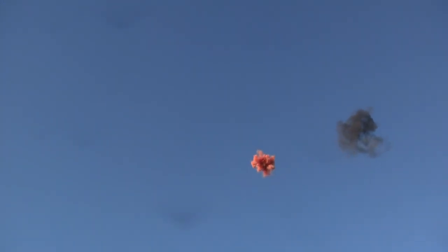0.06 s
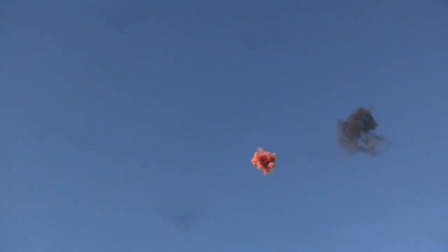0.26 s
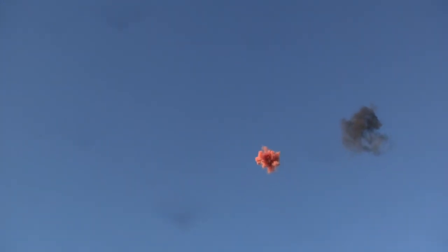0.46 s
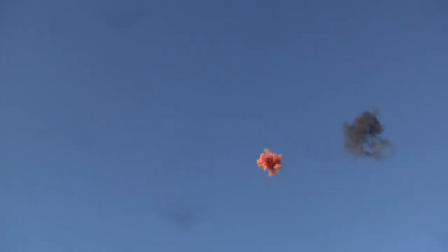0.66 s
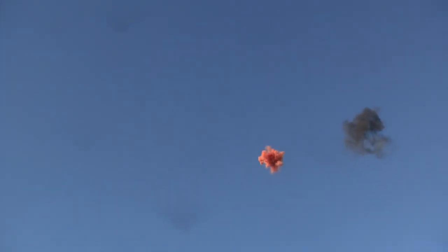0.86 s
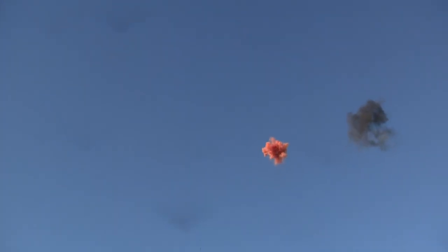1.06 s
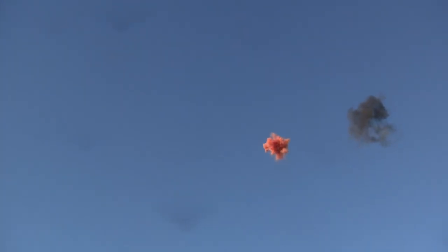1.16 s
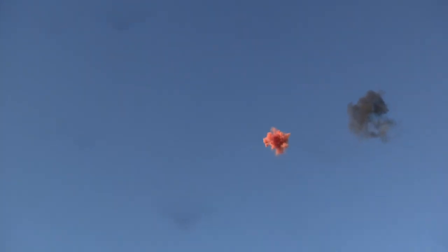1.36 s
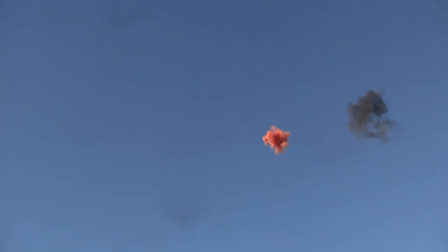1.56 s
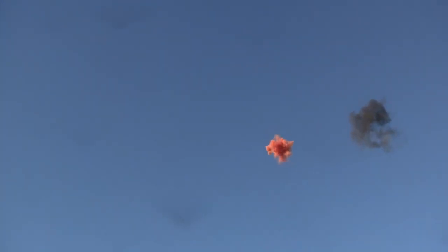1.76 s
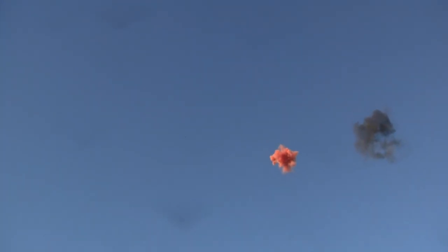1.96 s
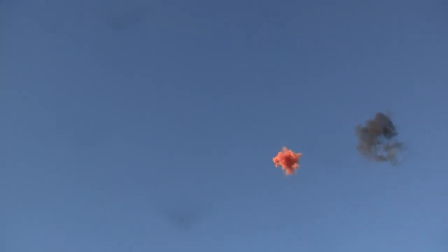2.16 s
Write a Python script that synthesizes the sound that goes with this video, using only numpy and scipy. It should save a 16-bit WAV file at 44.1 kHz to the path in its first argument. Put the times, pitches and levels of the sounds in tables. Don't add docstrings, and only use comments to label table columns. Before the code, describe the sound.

A firework shell bangs very loudly overhead, then rumbling echoes and fainter cracks trail away

```python
import sys
import numpy as np
from scipy import signal
from scipy.fft import rfft, irfft
from scipy.io import wavfile
from scipy.ndimage import uniform_filter1d

SR = 44100
rng = np.random.default_rng(int(sys.argv[2]) if len(sys.argv) > 2 else 0)


def master(y):
    cut = np.clip(np.atleast_2d(y).T, -1, 1)
    pcm = np.round(cut * 32767)
    wavfile.write(sys.argv[1], SR, pcm.astype(np.int16))


def voltage_ratio(level):
    return 10 ** (np.asarray(level, float) / 20)


N = 97020
T = np.arange(N) / SR
HZ = np.maximum(np.arange(N // 2 + 1) * SR / N, 1)
FAR_LAG_S = 3e-5
HALVES = np.array([[.5], [-.5]])


def curve(table):
    hz, value = np.array(table).T
    return np.interp(np.log(HZ), np.log(hz), value)


def colour(x, db):
    gain = voltage_ratio(db)
    return rfft(x) * gain / np.sqrt(np.mean(gain ** 2))


def shocks(scatter_db):
    x = rng.standard_normal(N) * voltage_ratio(scatter_db * rng.exponential(size=N))
    return x / x.std()


def walk(rate_hz):
    hold = int(SR / rate_hz)
    steps = np.repeat(rng.standard_normal(N // hold + 1), hold)
    x = uniform_filter1d(steps, hold)[:N]
    return x / x.std()


def delayed(x, lag_s):
    return irfft(rfft(x) * np.exp(-2j * np.pi * HZ * lag_s), N)


def ports(x, stray, left_db, lag_s):
    left = x * voltage_ratio(left_db / 2)
    right = (delayed(x, lag_s) + stray) * voltage_ratio(-left_db / 2)
    return np.array([left, right])


def bursts(arrivals, colour_table, scatter_db, left_db, stray_db, lag_s):
    peak_roundness = 1.3
    body_gain = curve(colour_table)
    x, stray = 0, 0
    for at, db, rise_ms, fall_ms, tilt in arrivals:
        from_peak = 1e3 * np.where(T < at, (at - T) / rise_ms, (T - at) / fall_ms)
        shape = voltage_ratio(db) * np.exp(-from_peak ** peak_roundness)
        gain = body_gain + tilt * np.log2(HZ / 1000)
        x = x + colour(shocks(scatter_db) * shape, gain)
        stray = stray + colour(rng.standard_normal(N) * shape, gain)
    stray_gain = voltage_ratio(stray_db + 3 * np.log2(1 + HZ / 1000))
    return ports(irfft(x, N), irfft(stray * stray_gain, N), left_db, lag_s)


def rumble():
    # t/s, level/dB, brightness above the knee/(dB per octave)
    course = [(0, -44.5, 2), (.1, -44.5, 3.5), (.22, -40.5, 1.5), (.4, -42.5, 8), (.55, -39.5, 2),
              (.65, -40, 2), (.8, -45, 2), (.9, -41.5, 2.5), (1.0, -45.5, 2.5), (1.2, -44.5, 2),
              (1.3, -46.5, 6.5), (1.41, -43, 2.5), (1.55, -45.5, 2.5), (1.63, -47, 2), (1.8, -45.5, 1),
              (1.92, -43, 0.5), (2.1, -47, 0.5), (2.2, -47, -1)]
    # f/Hz, gain/dB
    tone = [(30, -1), (70, -3.5), (165, -3), (400, -4), (800, -11), (2000, -25.5), (3600, -39.5),
            (10000, -83)]
    # f/Hz, left minus right/dB
    lean = [(60, -3), (110, 5), (200, 2), (380, 7.5), (700, 5.5), (1290, 5.5), (2380, 3.5), (4400, 2.5),
            (8120, -7), (15000, -2)]
    knee_hz, lumps_from_hz = 800, 120
    lump_db, lumps_per_s = 1.6, 160
    swell_db, swells_per_s = .6, 12
    likeness = 0.66

    at, db, bright = np.array(course).T
    same, left_only, right_only = (shocks(1.2) for _ in range(3))
    common = np.array([same, delayed(same, FAR_LAG_S)])
    separate = np.array([left_only, right_only])
    pair = rfft(np.sqrt(likeness) * common + np.sqrt(1 - likeness) * separate)
    gain = voltage_ratio(curve(tone) + HALVES * curve(lean))
    pair = pair * gain / np.sqrt(np.mean(gain ** 2))

    out, lumps = 0, walk(lumps_per_s)
    for centre in 25 * 2. ** np.arange(9):
        window = np.cos(np.pi / 2 * np.clip(np.log2(HZ / centre), -1, 1)) ** 2
        band = irfft(pair * window, N)
        lift = np.interp(T, at, bright) * max(np.log2(centre / knee_hz), 0)
        lumpy = lump_db * lumps * (lumps_from_hz < centre < knee_hz)
        out = out + band * voltage_ratio(lift + lumpy + swell_db * walk(swells_per_s))
    return out * voltage_ratio(np.interp(T, at, db))


def far_cracks():
    # t of peak/s, level/dB, rise/ms, fall/ms, tilt/(dB per octave)
    cracks = [(.012, -38, 11, 17, -11.5), (.005, -57, 14, 32, 3), (.153, -53, 0.77, 3.5, -2.5),
              (.42, -45.5, 52, 73, 5.5), (.605, -52.5, 15, 14, 2), (.657, -51.5, 13, 21, 5),
              (.74, -57, 84, 100, 0.5), (.95, -62, 54, 71, 2), (1.38, -64.5, 37, 78, 2),
              (.87, -60, 11, 45, 3), (1.16, -58.5, 4, 16, 1.5), (1.202, -60.5, 12, 15, 5),
              (1.2605, -34, 7.6, 5.2, -1), (1.283, -44, 9.7, 7.9, -1.5), (1.314, -44.5, 10.2, 12, -1.5),
              (1.425, -47, 24, 5.6, -4.5), (1.465, -50, 3.5, 7, -2), (1.488, -51, 8.6, 3.8, -3.5),
              (1.685, -64, 0.8, 3, -1), (2.2, -49.5, 9, 8, -6)]
    # f/Hz, gain/dB
    tone = [(200, -33), (500, -10), (900, 3), (1500, -2), (3000, -8.5), (5000, -16.5), (9000, -32.5),
            (14000, -60)]
    return bursts(cracks, tone, scatter_db=2., left_db=8, stray_db=-12, lag_s=FAR_LAG_S)


def thumps():
    # t/s, peak/dB, pitch f/Hz, fade/cycles, left minus right/dB
    swings = [(0.2354, -22.5, 336, 0.59, -1), (0.2418, -16.5, 101, 2.23, -1.5), (0.2489, -2, 1302, 3.5, 1),
              (0.2521, -4, 181, 0.85, .5), (.2537, -7.5, 575, 3.6, 2), (0.2544, -4, 1478, 4, -2),
              (0.2573, -14.5, 78, 1.3, 1), (0.458, -31, 90, 0.87, -9), (0.531, -27, 69.5, 1.4, 3.5),
              (0.578, -27, 264, 0.6, 9), (1.221, -28, 270, 0.78, 11), (1.2598, -29, 1150, 1.1, 12),
              (1.3147, -24.5, 1270, 1.4, 6), (0.1526, -37.5, 920, 0.76, -4), (1.685, -35.5, 610, 1.9, 9),
              (1.186, -38, 307, 1.1, 6), (1.333, -22, 210, 0.33, 8), (1.3425, -28, 260, 0.33, 14),
              (1.398, -26.5, 324, 0.39, 13), (1.404, -37.5, 158, 1.3, 18), (1.541, -40.5, 73, 2.3, 4),
              (1.854, -35, 350, 1.3, 10), (1.901, -38.5, 176, 2.2, 1)]
    out = 0
    for at, db, hz, fade_cycles, left_db in swings:
        cycles = np.maximum(T - at, 0) * hz
        onset = 1 - np.exp(-cycles / 0.14)
        swing = np.sin(2 * np.pi * cycles) * np.exp(-cycles / fade_cycles) * onset
        out = out + voltage_ratio(db + HALVES * left_db) * swing
    return out


def overhead_blast():
    # t of peak/s, level/dB, rise/ms, fall/ms, tilt/(dB per octave)
    arrivals = [(.24, -16, 2, 12, -3.5), (.249, -11.5, 5.6, 7.2, -1), (.2545, -7, 4.9, 6.2, -3),
                (.283, -14, 11.8, 13, -1.5), (.2925, -19, 2, 5.7, -2), (.265, -23, 12, 8, -0.5),
                (.31, -22, 8.8, 10, -1), (.33, -22.5, 10, 26, -3), (.352, -26, 30, 17, 1),
                (.4, -40.5, 4, 4, 2), (.378, -35, 24, 14, 4.5), (.447, -40, 8.9, 22, 4),
                (.468, -34, 14, 34, 0.5), (.51, -47, 18, 116, 0), (1.045, -42.5, 12, 36, -2.5),
                (1.095, -44.5, 23, 90, -2.5)]
    # f/Hz, gain/dB
    tone = [(100, -1.5), (300, -11.5), (600, -0.5), (1000, -3), (1450, -5), (2700, -8.5), (8500, -21.5),
            (16000, -43)]
    arrives_s, front_s = .2352, .003
    blast = bursts(arrivals, tone, scatter_db=1.6, left_db=0.45, stray_db=-20, lag_s=4e-5)
    return blast * np.clip((T - arrives_s) / front_s, 0, 1)


def ticks():
    # t/s, level/dB
    touches = [
        (1.752, -62.5),
        (1.84, -65),
    ]
    shape = sum(voltage_ratio(db) * np.exp(-np.abs(T - at) / 0.0014) for at, db in touches)
    band = signal.butter(2, [6000, 12000], "band", fs=SR, output="sos")
    return signal.sosfilt(band, shape * rng.standard_normal(N))


def scene():
    return rumble() + far_cracks() + thumps() + overhead_blast() + ticks()


def band_limit(x):
    return signal.sosfilt(signal.butter(12, 16410, fs=SR, output="sos"), x)


def record(dry):
    hiss_band = signal.butter(1, [2100, 10000], "band", fs=SR, output="sos")
    hiss = voltage_ratio(-74) * signal.sosfilt(hiss_band, rng.standard_normal(dry.shape))
    low_cut = signal.butter(2, 48, "high", fs=SR, output="sos")
    top_cut = signal.ellip(8, .2, 60, 15650, fs=SR, output="sos")
    heard = signal.sosfilt(np.vstack([low_cut, top_cut]), dry + hiss)
    return band_limit(np.clip(heard, -1, 1))


dry = scene()
out = record(dry)
master(out)
```